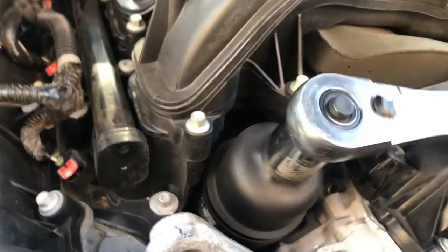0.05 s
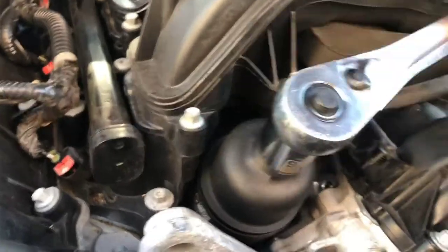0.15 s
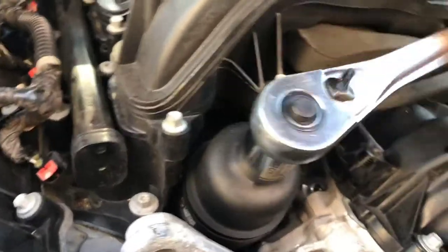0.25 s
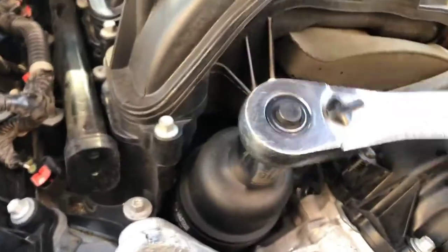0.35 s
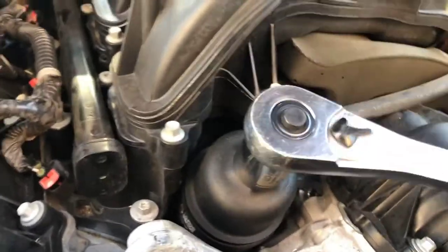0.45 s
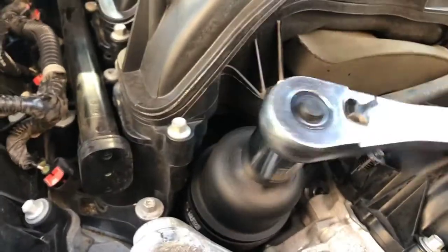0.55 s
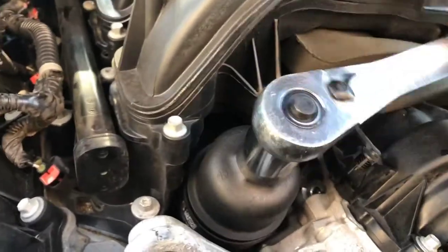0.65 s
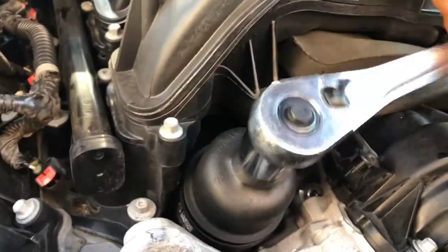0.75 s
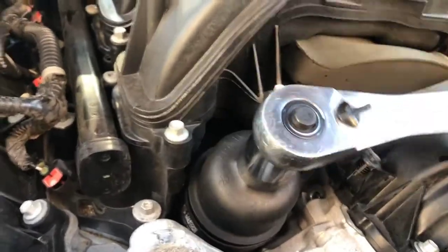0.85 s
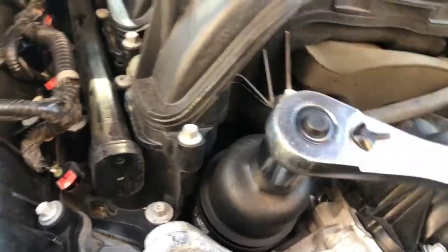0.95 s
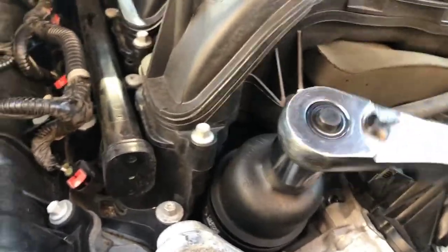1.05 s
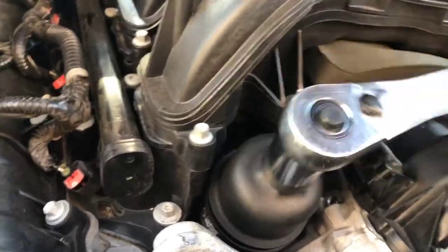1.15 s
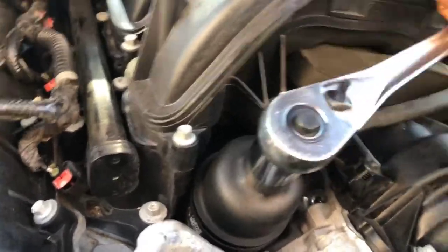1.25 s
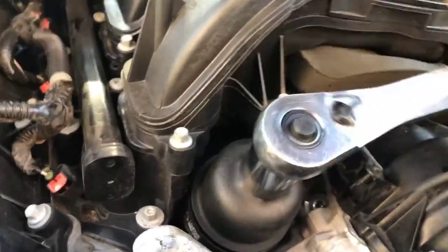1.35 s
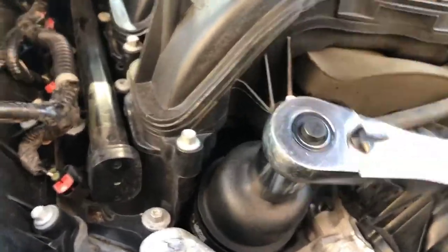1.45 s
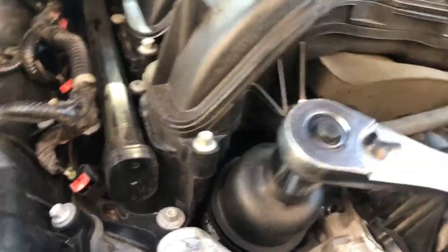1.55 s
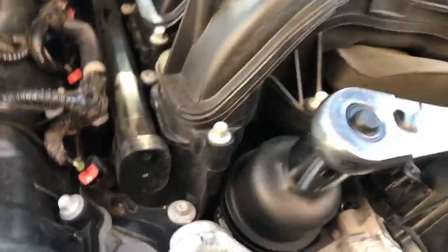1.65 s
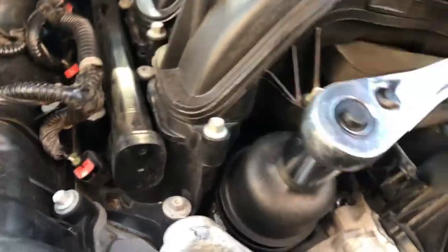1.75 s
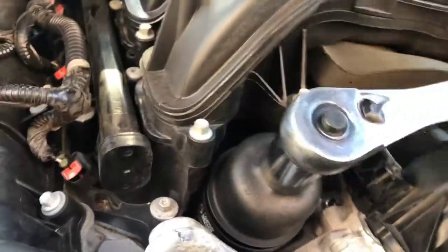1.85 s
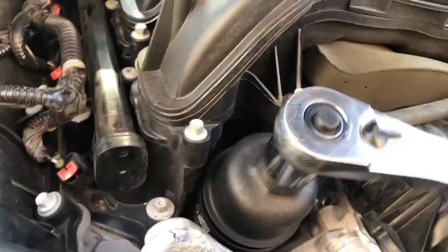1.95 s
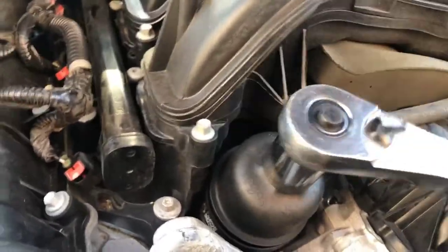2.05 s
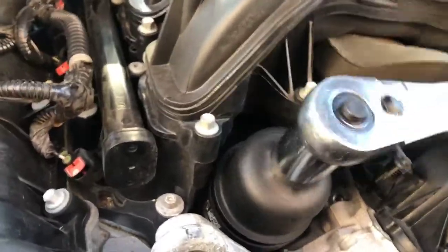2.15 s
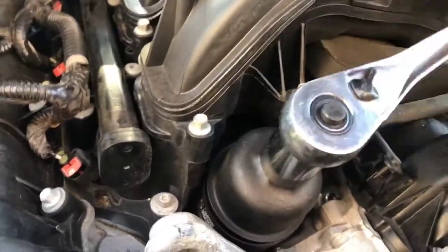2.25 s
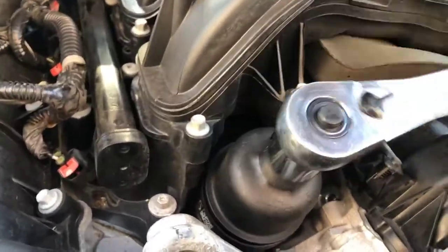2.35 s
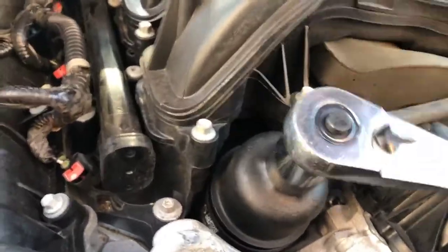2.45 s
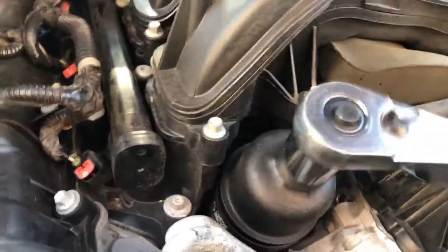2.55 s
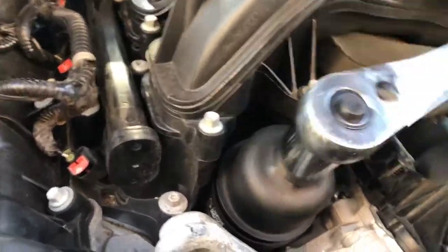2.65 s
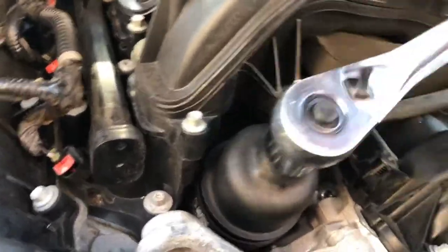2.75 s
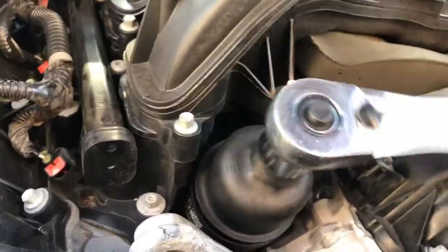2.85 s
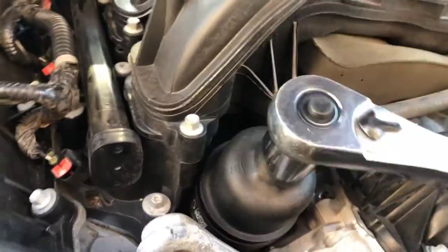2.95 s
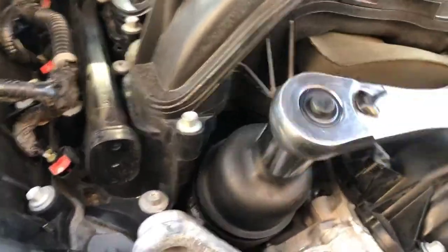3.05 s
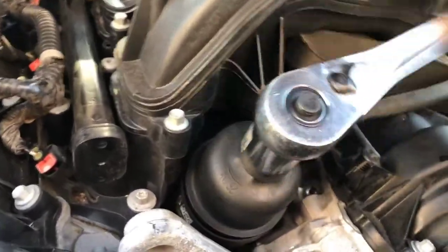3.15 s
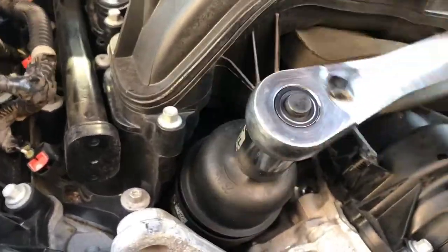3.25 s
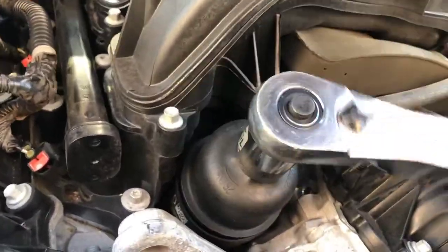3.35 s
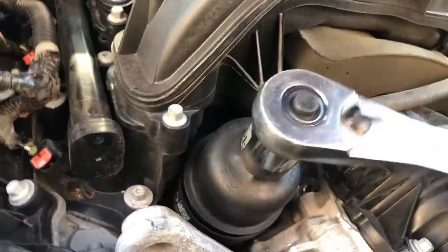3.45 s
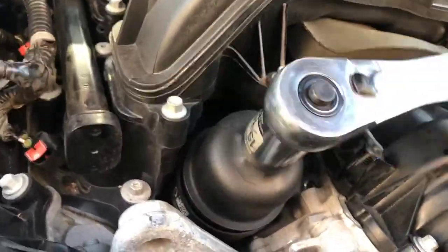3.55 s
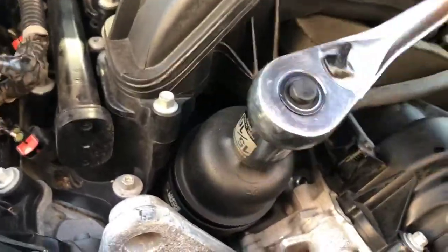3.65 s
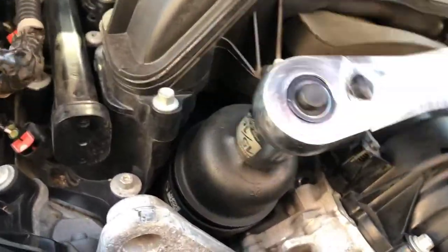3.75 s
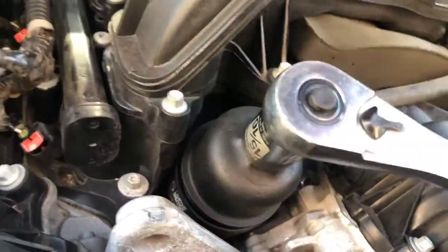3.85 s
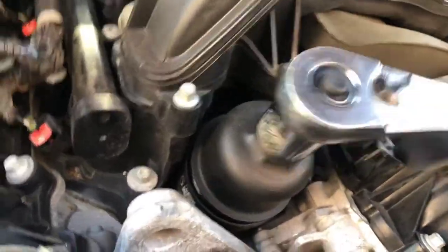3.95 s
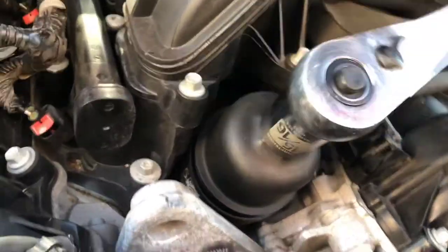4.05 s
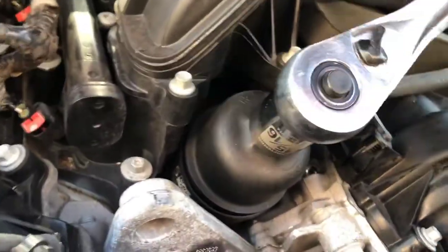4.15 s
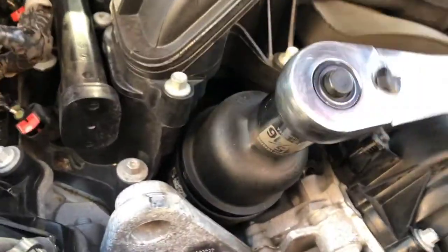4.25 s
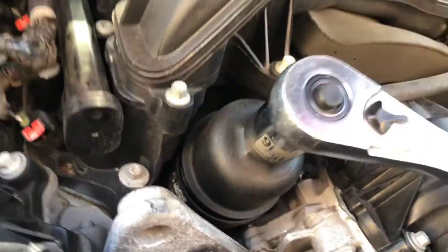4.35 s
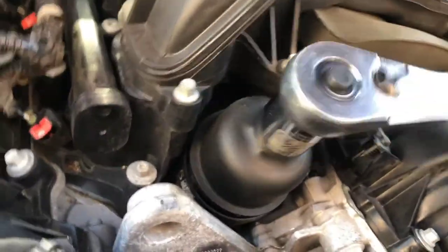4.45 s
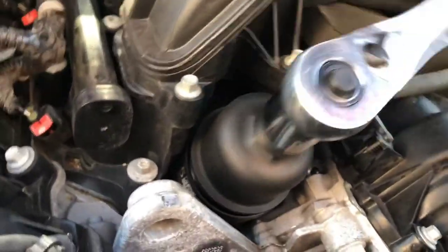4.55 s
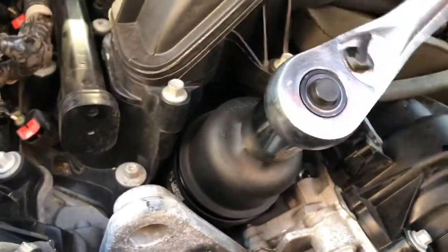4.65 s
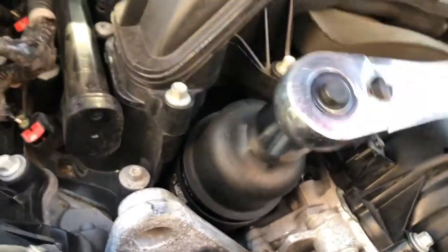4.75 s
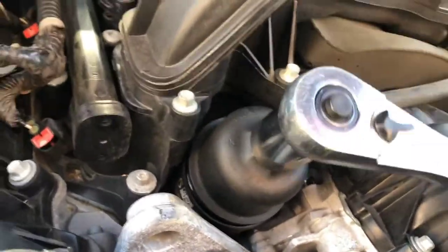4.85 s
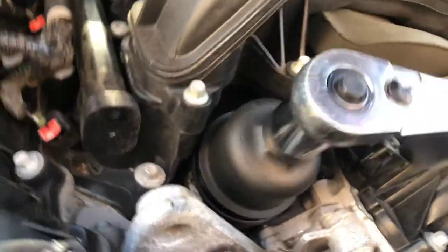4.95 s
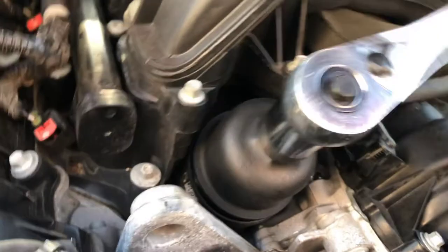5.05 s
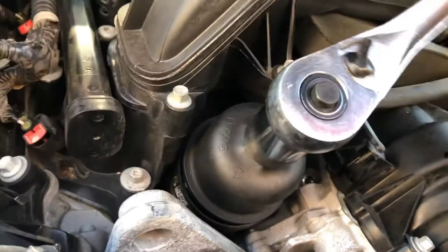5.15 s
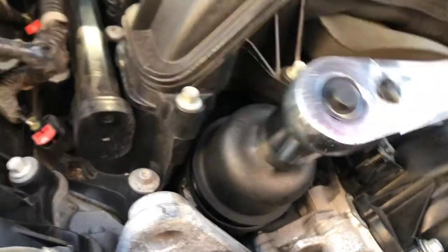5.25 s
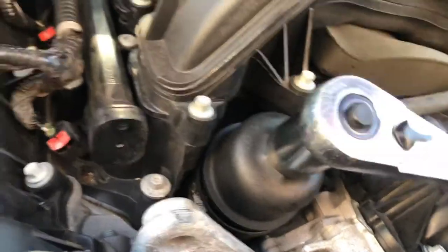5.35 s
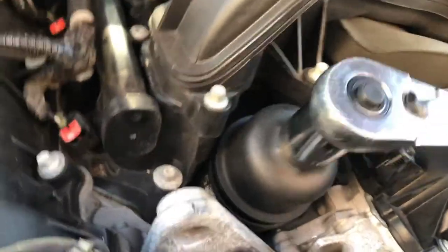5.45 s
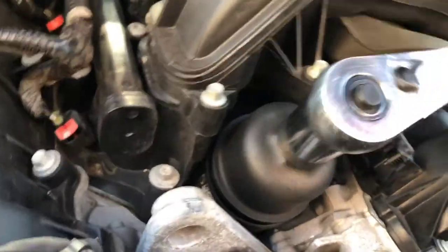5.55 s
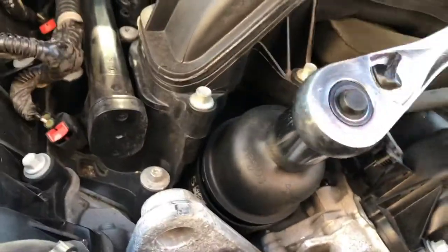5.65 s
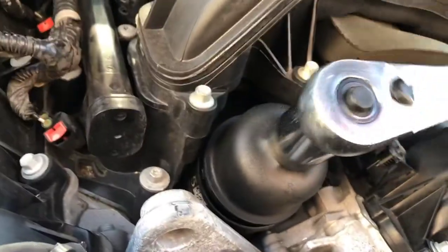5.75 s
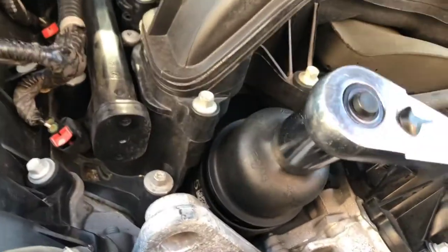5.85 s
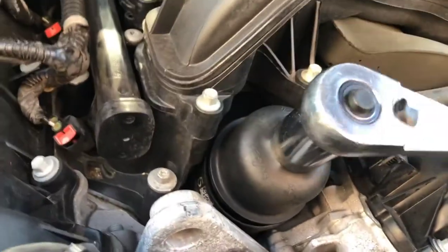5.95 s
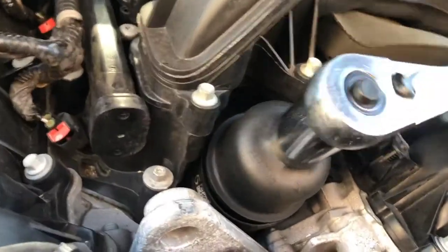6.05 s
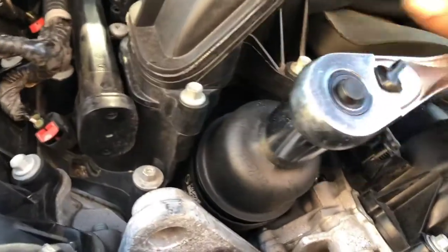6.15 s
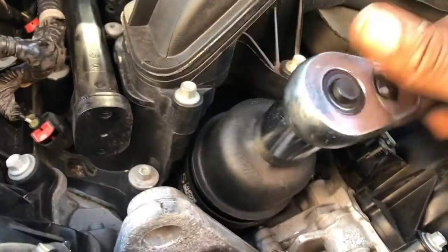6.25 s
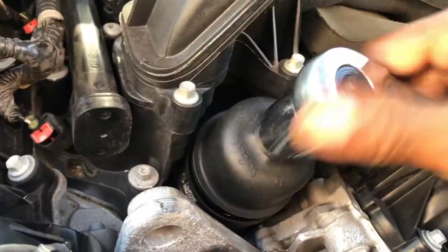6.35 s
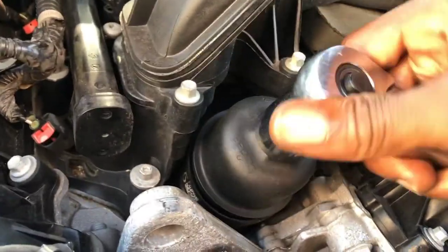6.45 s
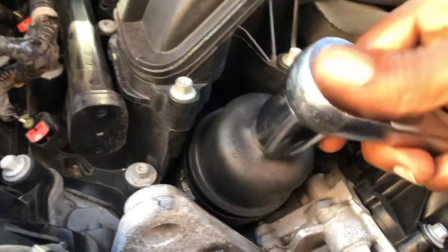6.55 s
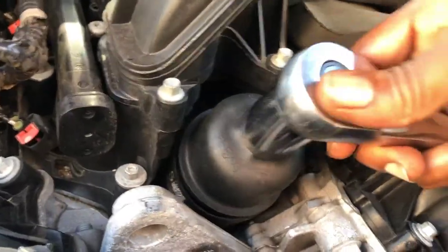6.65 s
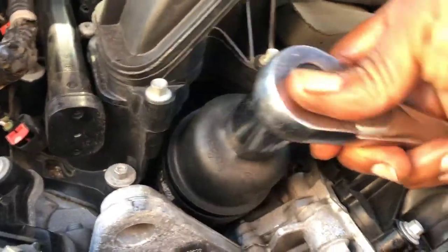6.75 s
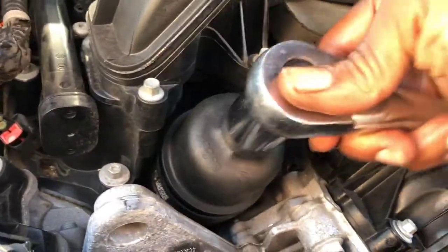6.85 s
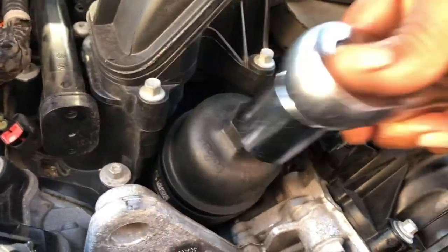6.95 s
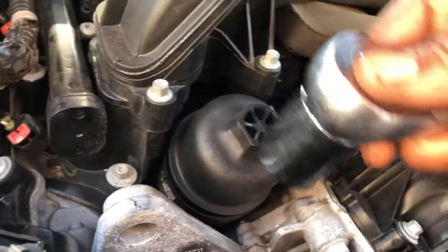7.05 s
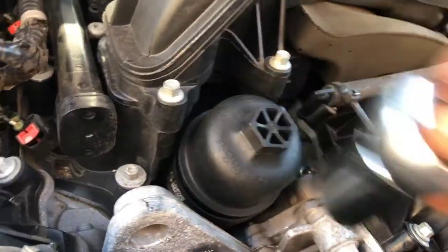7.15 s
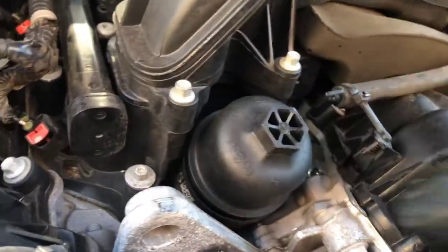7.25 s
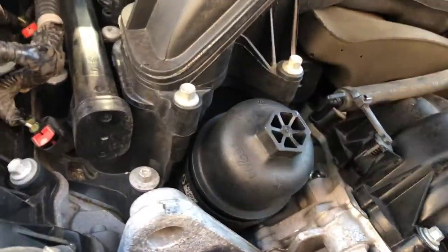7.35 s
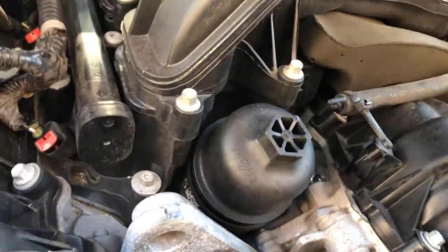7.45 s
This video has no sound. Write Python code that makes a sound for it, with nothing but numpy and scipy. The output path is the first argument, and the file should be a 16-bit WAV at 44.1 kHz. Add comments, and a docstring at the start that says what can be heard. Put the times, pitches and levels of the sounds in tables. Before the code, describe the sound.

Heard up close outdoors, a ratchet wrench swings back and forth on a plastic cap in a car's engine bay. Each back swing gives a quick burst of bright clicks, and each pull a faint rub, while the loose socket clacks and bumps the housing. After about six seconds the clicking stops, a catch snaps with a dull knock, and the socket clinks free. Very faint traffic and a far bird lie behind.

```python
"""A steel ratchet works a plastic cap loose in an engine bay, close to a phone, outdoors.
On each pull the cap's thread and seal rub; on each back swing the pawl snaps over the teeth.
Impacts excite the damped modes of steel and cap, and handle and socket knock dully on the housing.
The socket clinks and is lifted off ringing; a far bird chirps over distant traffic."""
import sys
import numpy as np
from scipy import signal
from scipy.fft import rfft, irfft, next_fast_len
from scipy.io import wavfile
from scipy.ndimage import uniform_filter1d

SR = 44100
rng = np.random.default_rng(int(sys.argv[2]) if len(sys.argv) > 2 else 0)


def transcribe(u):
    """Save the signal u as a 16-bit wav file named by the first command-line argument.

    u: samples, shape (n,) or (channels, n), limited to [-1, 1]; the rate is SR.
    q: integer samples, one column per channel.
    """
    v = np.clip(np.atleast_2d(u).T, -1, 1)
    q = np.round(v * 32767).astype(np.int16)
    wavfile.write(sys.argv[1], SR, q)


N = 330309


def undb(db):
    """Amplitude ratio of a level in decibels."""
    return 10 ** (np.asarray(db) / 20)

def unit(x):
    """Normalisation to rms 1."""
    return x / np.sqrt(np.mean(x ** 2))

def peak(x):
    """Normalisation by short-time power: the loudest millisecond or two peaks near 1."""
    return x / np.sqrt(4 * np.max(uniform_filter1d(x ** 2, size=64)))

def fade(t, t60):
    """Exponential decay, 60 dB in t60 seconds."""
    return np.exp(-np.log(1000) * t / t60)

def add(out, start, x):
    """Superposition of x on out from a start time in seconds."""
    i = int(start * SR)
    out[i:i + len(x)] += x[:N - i]

def filtered(x, order, hz, kind="low"):
    """Maximally flat filtering."""
    return signal.lfilter(*signal.butter(order, hz, kind, fs=SR), x)

def colour(x, spectrum):
    """Spectral shaping, interpolated over log frequency."""
    hz, db = np.transpose(spectrum)
    size = next_fast_len(len(x), real=True)
    f = np.maximum(np.arange(size // 2 + 1) * SR / size, 1)
    gain = undb(np.interp(np.log(f), np.log(hz), db))
    return irfft(rfft(x, size) * gain, size)[:len(x)]

def wander(rate):
    """Random modulation: ramps between rate values a second, spread near 1."""
    hold = int(SR / rate)
    return uniform_filter1d(np.repeat(rng.standard_normal(N // hold + 1), hold), hold)[:N]

def ring(modes, t, scatter_db, detune):
    """Modal impulse response; each blow lands elsewhere, so strength, tuning and damping vary."""
    hz, db, t60 = np.transpose(modes)[:, :, None]
    strength, tuning, damping = rng.standard_normal((3, len(modes), 1))
    envelope = undb(db + scatter_db * strength) * fade(t, t60 * undb(-scatter_db * np.abs(damping)))
    return np.sum(envelope * np.sin(2 * np.pi * hz * (1 + detune * tuning) * t), axis=0)

def excite(force, response):
    """Forced vibration: the convolution of a force with an impulse response."""
    return signal.fftconvolve(force, response)[:len(force)]

def strokes(starts, ends, levels_db, bluntness):
    """Friction sound follows sliding speed: each stroke of the hand swells and stops."""
    out, t = np.zeros(N), np.arange(N) / SR
    for start, end, db in zip(starts, ends, levels_db):
        speed = np.sin(np.pi * np.clip((t - start) / (end - start), 0, 1))
        out += undb(db) * speed ** bluntness * (t < end) * (t > start)
    return out

# modes of the ratchet head with socket, and of the cap: (frequency [Hz], level [dB], t60 [s])
STEEL_MODES = [(3565, -14.5, 0.044), (4844, -7.5, 0.022), (5162, -3.5, 0.0094), (6640, -16, 0.035),
               (7900, -15, 0.028), (9510, -6, 0.019), (10710, -8, 0.021), (12110, -4, 0.02),
               (15280, -11.5, 0.0073)]
CAP_MODES = [(1076, -7.5, 0.058), (1380.3, -1, 0.083), (1687, -1.5, 0.026), (1910, -5.5, 0.018),
             (2506, -7, 0.025)]
LOOSE_CAP_DB, FREED_CAP_DB = -15.5, -33  # cap ring in a blow, with slack and with the socket freed
TICK_TREBLE_DB, CLACK_TREBLE_DB = -20, -12

def strikes(levels_db, cap_db, treble_db, chatter_s):
    """Impact excitation, one sound per blow: chatter rings head and cap; nearby parts scatter it back."""
    t = np.arange(2048) / SR
    noise = rng.standard_normal((len(levels_db), 3, len(t)))
    steel, cap = np.empty((2, len(levels_db), len(t)))
    for k, (steel_force, _, cap_force) in enumerate(noise):
        steel[k] = peak(excite(steel_force * fade(t, chatter_s), ring(STEEL_MODES, t, 4.5, .012)))
        cap[k] = peak(excite(cap_force * fade(t, .02), ring(CAP_MODES, t, 3, .004)))
    scattered = noise[:, 1] * (undb(-5.5) * fade(t, .015) + undb(-23) * fade(t, .069))
    steel = filtered(steel + scattered, 2, 2200, "high")
    body = filtered(steel, 4, 8500)
    blows = body + undb(treble_db)[..., None] * (steel - body) + undb(cap_db)[..., None] * cap
    blows *= 1 - np.exp(-t / .00046)  # a blow builds up over its first contacts
    taper = np.cos(np.pi / 2 * t / t[-1])
    return [undb(db) * peak(blow) * taper for db, blow in zip(levels_db, blows)]

def friction(spectrum, grain_db, flicker_db, cap_db, steel_db):
    """Roughness noise: grit between sliding faces hisses and keeps cap and steel faintly ringing."""
    t = np.arange(4096) / SR
    noise = rng.standard_normal((2, N))
    hiss, grit = noise * undb(grain_db * rng.exponential(size=N) + flicker_db * wander(90))
    cap = unit(excite(grit, ring(CAP_MODES[1::3], t, 0, 0)))
    steel = unit(excite(grit, ring(STEEL_MODES[1:5], t, 0, 0)))
    return unit(colour(hiss, spectrum)) + undb(cap_db) * cap + undb(steel_db) * steel

# outdoor background spectrum: (frequency [Hz], relative density [dB])
AIR_SPECTRUM = [(25, -19.5), (60, -14.5), (110, -12), (190, -17.5), (500, -28.5), (2500, -44), (16000, -56)]

def distant_traffic():
    """Broadband ambient noise: hiss, and a traffic rumble under slow amplitude modulation."""
    noise = unit(colour(rng.standard_normal(N), AIR_SPECTRUM))
    rumble = filtered(noise, 2, 180)
    return undb(-63) * (noise - rumble + undb(1 + .94 * wander(3.4)) * rumble)

# a back swing and the pull after it:
# (swing start [s], pull start [s], pull end [s], drag level [dB], rasp level [dB], pawl treble [dB])
STROKES = [(-.3, -0.045, 0.2, -54, -53.5, 3), (0.22, 0.488, 0.7, -55.5, -52.5, 3),
           (0.728, 1.049, 1.24, -55, -51.5, 1.5), (1.273, 1.577, 1.8, -54.5, -53, 3.5),
           (1.797, 2.041, 2.26, -49, -51.5, 4.5), (2.273, 2.544, 2.72, -50, -51.5, 3.5),
           (2.742, 2.997, 3.19, -48.5, -51.5, 1.5), (3.199, 3.46, 3.66, -52, -57.5, 1),
           (3.666, 3.914, 4.125, -52.5, -53.5, -6), (4.139, 4.408, 4.56, -55, -52.5, 3),
           (4.664, 4.931, 5.11, -55, -51, 6.5), (5.183, 5.384, 5.62, -55.5, -52.5, 2.5),
           (5.724, 5.957, 6.47, -57.5, -63, -10.5)]
# a second push on one pull, then the hand works the socket off and sets it down:
# (start [s], end [s], drag level [dB], rasp level [dB])
HANDLING = [(4.55, 4.605, -60, -54), (6.41, 6.49, -61, -68), (6.447, 6.806, -60.5, -80),
            (6.827, 6.93, -58.5, -61), (6.898, 6.917, -51, -75), (7.436, 7.566, -60, -87)]
# friction spectrum of thread and seal: (frequency [Hz], relative density [dB])
RASP_SPECTRUM = [(200, 7), (1500, 6), (5000, 0), (8000, 2.5), (13000, -3.5), (16000, -2.5)]

def thread_rasp():
    """Sliding friction on the pulls and in handling, brightest where the hand is fastest."""
    spans = np.vstack([np.array(STROKES)[:, [1, 2, 4]], np.array(HANDLING)[:, [0, 1, 3]]]).T
    rasp = friction(RASP_SPECTRUM, grain_db=3, flicker_db=3, cap_db=-5, steel_db=-7)
    dull = filtered(rasp, 1, 4000)
    return strokes(*spans, bluntness=.65) * dull + strokes(*spans, bluntness=.74) * (rasp - dull)

# the pawl dropping off a tooth: (time [s], peak level [dB])
TOOTH_DROPS = [(0.2186, -23), (0.3247, -18.5), (0.3605, -18), (0.394, -16), (0.4711, -20.5), (0.869, -19.5),
               (0.9084, -16), (0.956, -17), (1.396, -20), (1.427, -18.5), (1.4587, -14), (1.5007, -17),
               (1.8574, -31.5), (1.9002, -22), (1.929, -13), (1.9593, -15.5), (2.0004, -20.5),
               (2.3513, -17), (2.369, -17), (2.3985, -17), (2.4276, -15.5), (2.4576, -17), (2.815, -17),
               (2.8412, -17.5), (2.869, -14.5), (2.8947, -17.5), (3.2871, -17.5), (3.3183, -15.5),
               (3.3466, -16), (3.3799, -17.5), (3.702, -39), (3.7504, -16.5), (3.7774, -20), (3.803, -17),
               (3.833, -15.5), (4.166, -36), (4.2124, -15.5), (4.2414, -16.5), (4.2702, -17.5),
               (4.3001, -15), (4.3371, -18.5), (4.6588, -36.5), (4.7049, -17.5), (4.738, -16.5),
               (4.772, -16.5), (4.8025, -15.5), (4.8425, -19), (5.1692, -36.5), (5.22, -19), (5.255, -15.5),
               (5.2882, -18), (5.3215, -16), (5.397, -21.5), (5.684, -40), (5.7421, -19), (5.7995, -21.5),
               (5.844, -21.5)]

def pawl():
    """Impact of the pawl as it drops; within a run it first scuffs up the tooth and ticks against it."""
    out, t = np.zeros(N), np.arange(1024) / SR
    times, db = np.transpose(TOOTH_DROPS)
    swing_starts, *_, treble_db = np.transpose(STROKES)
    stroke = np.searchsorted(swing_starts, times + .025) - 1
    scuffs = filtered(rng.standard_normal((len(times), len(t))), 2, [1200, 6500], "band")
    snaps = strikes(db, cap_db=-24, treble_db=treble_db[stroke], chatter_s=.0054)
    strength, timing = rng.standard_normal((len(times), 2)).T
    ticks = strikes(db - 20.5 + 2.5 * strength, LOOSE_CAP_DB, TICK_TREBLE_DB, chatter_s=.013)
    ticks = filtered(ticks, 2, 6000)
    lead_s = .0062 * np.exp(.32 * timing)
    in_run = np.diff(times, prepend=0) < .062
    for k, when in enumerate(times):
        add(out, when, snaps[k])
        if in_run[k]:
            rising_scuff = (scuffs[k] * fade(t, .015))[::-1]
            add(out, when - len(t) / SR, undb(db[k] - 19.5) * rising_scuff)
            add(out, when - lead_s[k], ticks[k])
    return out

# friction spectrum of the back swing: (frequency [Hz], relative density [dB])
DRAG_SPECTRUM = [(100, -4), (400, 9), (1500, 0), (5000, -12), (9000, -23.5), (16000, -23)]

def swing_drag():
    """Sliding friction, dull and stuttering, on the back swings and in handling."""
    spans = np.vstack([np.array(STROKES)[:, [0, 1, 3]], np.array(HANDLING)[:, :3]]).T
    drag = friction(DRAG_SPECTRUM, grain_db=1.5, flicker_db=6, cap_db=-13, steel_db=-19)
    return strokes(*spans, bluntness=.2) * drag

def socket_rattle(contacts=6, ticks_per_s=120):
    """Shot noise: on the back swing the loose socket ticks at random at a few points of contact."""
    starts, pulls, _, drag_db, _, _ = np.transpose(STROKES)
    swing = strokes(starts, pulls - .07, drag_db, bluntness=.2)  # the handle rests before the pull
    step = 64  # samples between possible ticks
    chance, size = rng.random((contacts, N // step, 2)).transpose(2, 0, 1)
    touches = chance < ticks_per_s * step / SR / contacts
    hits = np.zeros((contacts, N))
    hits[:, :N // step * step:step] = touches * undb(5 - 3 * np.log(size + 1e-9))
    ticks = np.array(strikes(np.zeros(contacts), LOOSE_CAP_DB, TICK_TREBLE_DB, chatter_s=.0038))
    return signal.oaconvolve(hits * swing, ticks, axes=1)[:, :N].sum(axis=0)

# blows on the housing: (time [s], level [dB], pitch at the point struck [Hz], relative boom [dB])
KNOCKS = [(.2314, -39, 262, -20), (0.753, -35, 276, -25), (1.4963, -41, 533, -6), (1.981, -39, 553, -7),
          (2.216, -33, 431, -34), (2.465, -32, 560, -4), (2.6872, -33, 482, -26), (2.9008, -29, 540, -7),
          (3.158, -39, 480, -30), (3.391, -38, 580, -10), (3.6073, -33.5, 412, -20), (3.8419, -31, 560, 0),
          (4.448, -38, 654, -24), (6.4604, -20, 290, -8), (6.826, -38.5, 380, -13), (7.4374, -42, 820, -16)]
# housing modes: (multiple of the pitch [ratio], level [dB], t60 [s])
HOUSING_MODES = [(1, 0, 0.045), (1.5, -5, 0.04)]
# body panel modes: (frequency [Hz], level [dB], t60 [s])
PANEL_MODES = [(92, -2, .13), (120, -1, 0.15), (165, -9, 0.057)]

def housing_knocks():
    """A soft impact excites low modes: a dull crack, the housing's ring and a late boom of the panels."""
    out, t = np.zeros(N), np.arange(12288) / SR
    for when, db, hz, boom_db in KNOCKS:
        noise = filtered(rng.standard_normal(len(t)), 2, [220, 2000], "band")
        modes = np.multiply(HOUSING_MODES, [hz, 1, 1])
        housing = peak(excite(noise * fade(t, .033), ring(modes, t, 2, .03)))
        housing *= 1 - np.exp(-t / .001)
        push = rng.standard_normal(len(t)) * t * fade(t, .1)
        boom = peak(excite(push, ring(PANEL_MODES, t, 2.5, .04)))
        crack = undb(-6) * peak(noise * fade(t, .028))
        add(out, when, undb(db) * (crack + housing + undb(boom_db) * boom))
    return out

# slack taken up between drive, socket and cap, and, just before some tooth drops (5.25 to 5.31 s), the pawl
# ticking as it climbs the tooth: (time [s], peak level [dB])
CLACKS = [(0.232, -24), (0.2703, -32.5), (0.2853, -28.5), (0.7357, -30), (0.753, -14), (0.823, -31.5),
          (1.018, -45), (1.035, -50), (1.063, -35.5), (1.278, -33.5), (1.2914, -16.5), (1.333, -38),
          (1.3635, -28), (1.5667, -37), (1.583, -25.5), (1.7996, -28), (1.812, -17), (1.833, -26.5),
          (1.881, -36), (1.896, -23.5), (2.063, -33), (2.2122, -23), (2.276, -33.5), (2.289, -16.5),
          (2.3094, -30), (2.328, -35), (2.527, -40), (2.54, -33), (2.559, -30), (2.6731, -31.5),
          (2.7479, -25), (2.7723, -34.5), (2.998, -36.5), (3.017, -28), (3.2107, -22), (3.2182, -28.5),
          (3.244, -27), (3.265, -19.5), (3.45, -38), (3.4564, -36), (3.475, -25), (3.6039, -29),
          (3.6175, -25.5), (3.681, -34), (3.853, -34), (3.894, -29.5), (3.904, -30.5), (3.9401, -29),
          (4.1488, -35), (4.397, -42), (4.4173, -26), (4.6418, -35.5), (4.8977, -33), (4.917, -38),
          (4.9272, -29.5), (5.153, -40), (5.183, -34), (5.2485, -27), (5.281, -28), (5.31, -27),
          (5.407, -24.5), (5.432, -34), (5.4433, -23), (5.659, -44), (5.795, -27), (5.913, -45),
          (5.9186, -37), (5.991, -43), (6.011, -41), (6.0283, -40), (6.201, -47), (6.2439, -30.5),
          (6.28, -36.5), (6.6578, -46), (6.7148, -46.5), (6.9251, -28.5), (7.2815, -57)]

def slack_clacks():
    """Backlash ends in impact: softer blows are duller, and those at a reversal bear on the cap."""
    out = np.zeros(N)
    times, db = np.transpose(CLACKS)
    dulling_db = .97 * (db - db.max())
    at_reversal = np.any(np.abs(times[:, None] - np.array(STROKES)[:, 0]) < .05, axis=1)
    slack_cap_db = np.where(times > RELEASE_S, FREED_CAP_DB, LOOSE_CAP_DB)
    cap_db = np.where(at_reversal, dulling_db - 3, slack_cap_db)
    treble_db = CLACK_TREBLE_DB + dulling_db + 3.5 * rng.standard_normal(len(times))
    for when, clack in zip(times, strikes(db, cap_db, treble_db, chatter_s=.0025)):
        add(out, when, clack)
    return out

# modes of the loose socket on its drive: (frequency [Hz], level [dB], t60 [s])
SOCKET_MODES = [(4920, 2.5, 0.051), (6560, -8.5, .035), (12400, -2.5, .016)]

def socket_ring(db):
    """Damped free vibration of the socket on its drive."""
    return undb(db) * peak(ring(SOCKET_MODES, np.arange(4096) / SR, 1.4, .002))

# clinks of the loose socket: (time [s], tick level [dB])
CLINKS = [(5.9357, -31.5), (5.953, -38), (5.967, -41.5), (6.2306, -35), (6.2547, -42), (6.571, -55),
          (6.605, -44.5), (6.614, -43), (6.74, -47), (6.8367, -36.5)]

def socket_clinks():
    """Light impacts: each contact gives a tick and excites the socket's modes."""
    out = np.zeros(N)
    times, levels_db = np.transpose(CLINKS)
    ticks = strikes(levels_db, FREED_CAP_DB, CLACK_TREBLE_DB, chatter_s=.0029)
    for when, db, tick in zip(times, levels_db, ticks):
        add(out, when, tick)
        add(out, when, socket_ring(db - 4))
    return out

RELEASE_S = 6.4072

def catch_release():
    """Impulsive excitation: the catch that holds the socket snaps open and sets it ringing."""
    out = np.zeros(N)
    add(out, RELEASE_S, strikes([-14], FREED_CAP_DB, treble_db=3.5, chatter_s=.006)[0])
    add(out, RELEASE_S, socket_ring(-16))
    return out

# partials of the freed socket: (time [s], frequency [Hz], level [dB], t60 [s])
CHIME = [(6.926, 12000, -56, 0.24), (6.926, 11850, -55, 0.42)]

def socket_chime():
    """Free vibration: the lifted socket rings in two close, lightly damped modes."""
    out, t = np.zeros(N), np.arange(16384) / SR
    for when, hz, db, t60 in CHIME:
        add(out, when, undb(db) * fade(t, t60) * np.sin(2 * np.pi * hz * t))
    return out

# bird whistles: (start [s], end [s], start frequency [Hz], end frequency [Hz], level [dB])
CHIRPS = [(6.935, 7.003, 2600, 3050, -72), (7.375, 7.45, 2150, 2220, -68), (7.449, 7.487, 2210, 2830, -66)]

def far_bird():
    """Frequency modulation: each whistle is a pure tone gliding upward."""
    out = np.zeros(N)
    for start, end, start_hz, end_hz, db in CHIRPS:
        progress = np.linspace(0, 1, int((end - start) * SR))
        phase = 2 * np.pi * np.cumsum(start_hz + (end_hz - start_hz) * progress) / SR
        add(out, start, undb(db) * np.sin(np.pi * progress) ** .5 * np.sin(phase))
    return out

def scene():
    """Linear superposition of all sources in one channel."""
    return (distant_traffic() + thread_rasp() + pawl() + swing_drag() + socket_rattle()
            + housing_knocks() + slack_clacks() + socket_clinks() + catch_release()
            + socket_chime() + far_bird())[None]

def record(dry):
    """Band limiting: the phone drops the deepest bass, shelves the top edge down and cuts above it."""
    below = signal.sosfiltfilt(signal.butter(12, 15800, fs=SR, output="sos"), dry)
    shelved = below + undb(-38) * (dry - below)
    top_cut = signal.ellip(10, .2, 80, 16800, fs=SR, output="sos")
    return signal.sosfilt(top_cut, filtered(shelved, 3, 45, "high"))

dry = scene()
out = record(dry)
transcribe(out)
```